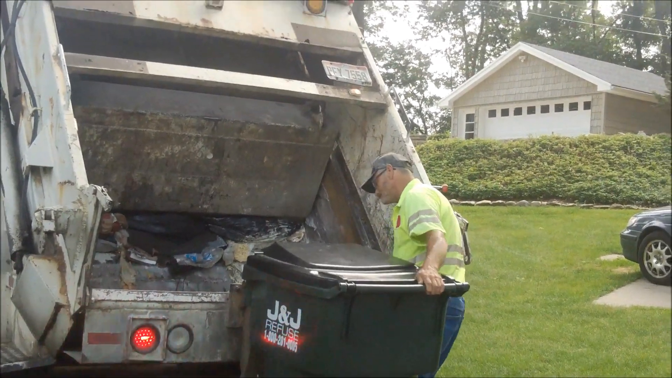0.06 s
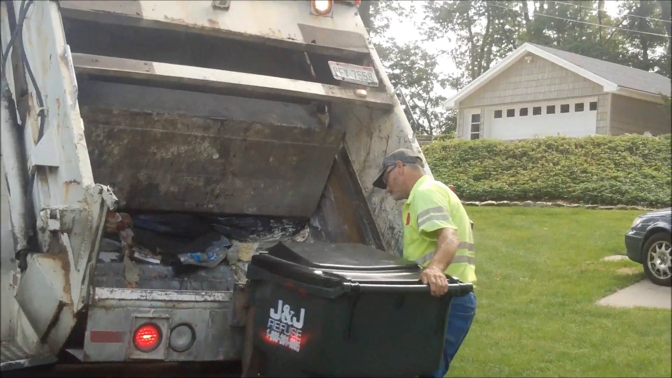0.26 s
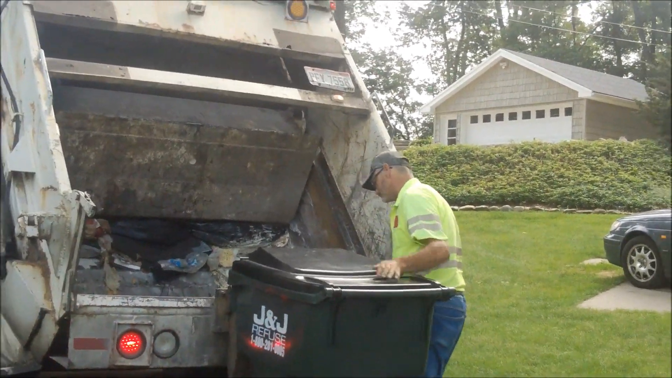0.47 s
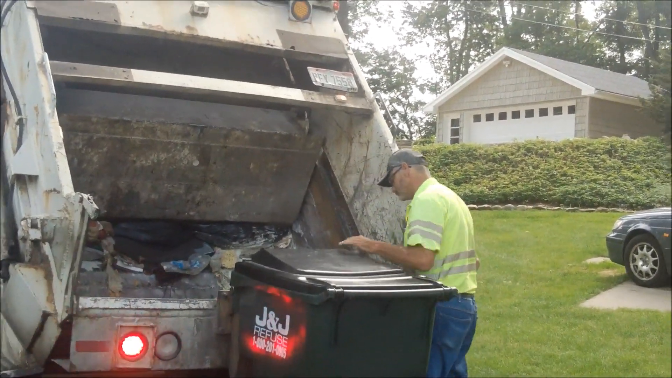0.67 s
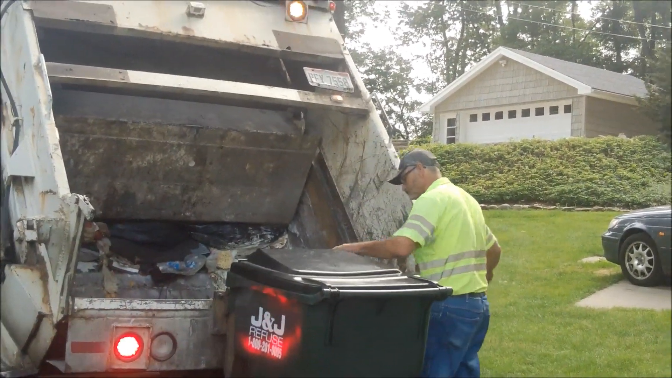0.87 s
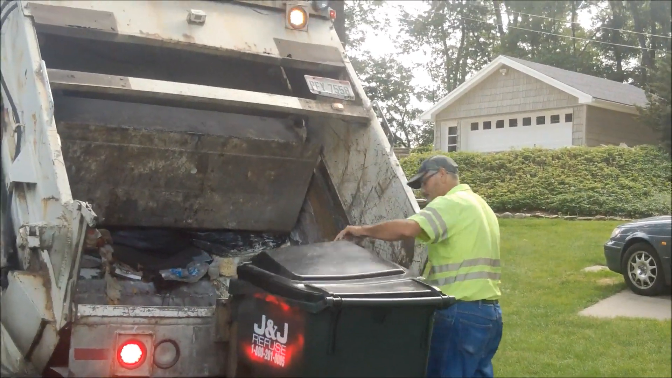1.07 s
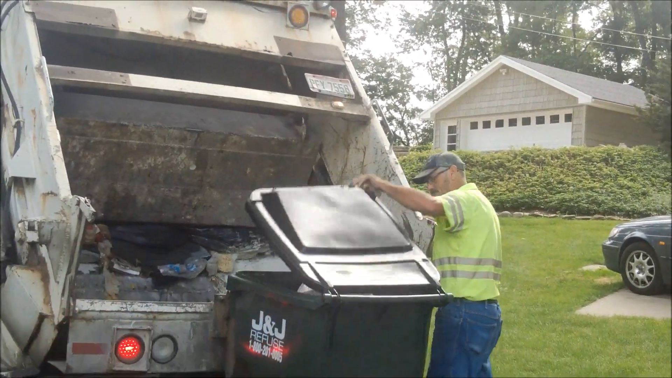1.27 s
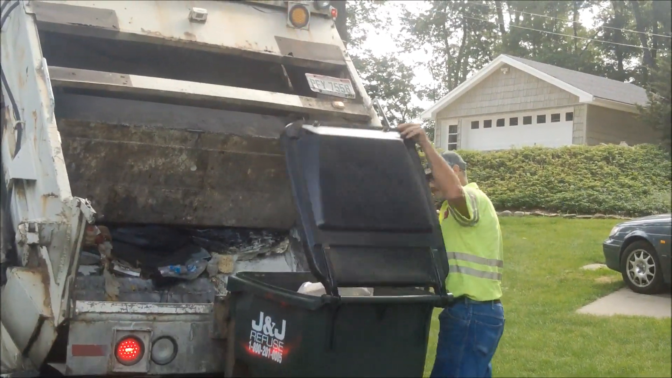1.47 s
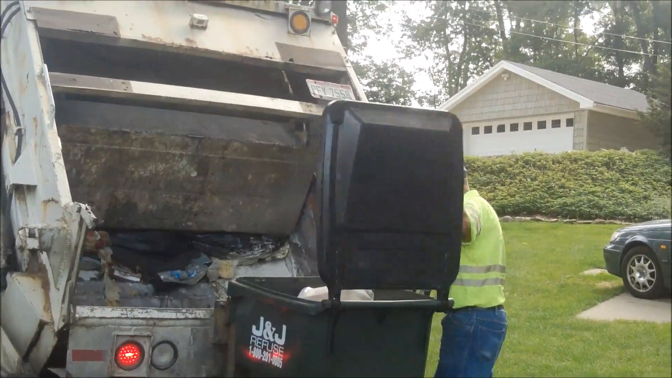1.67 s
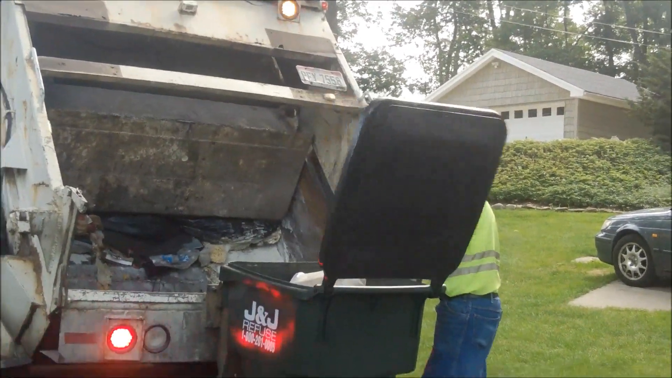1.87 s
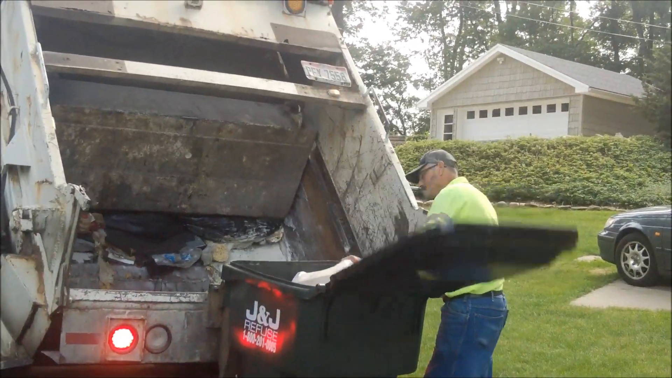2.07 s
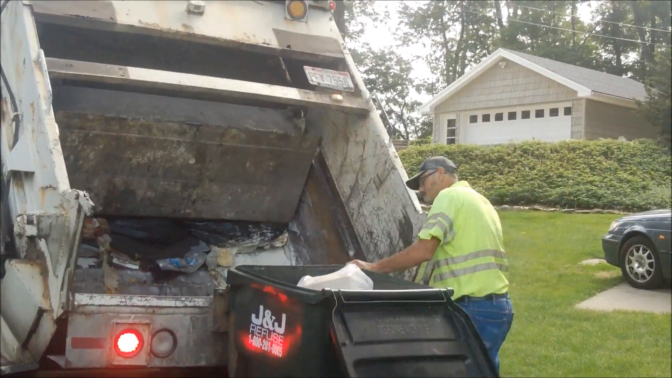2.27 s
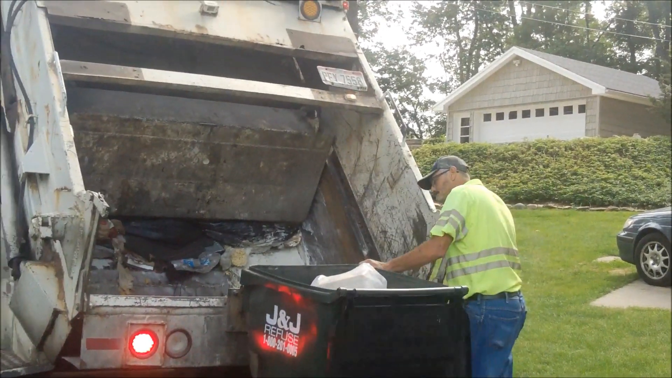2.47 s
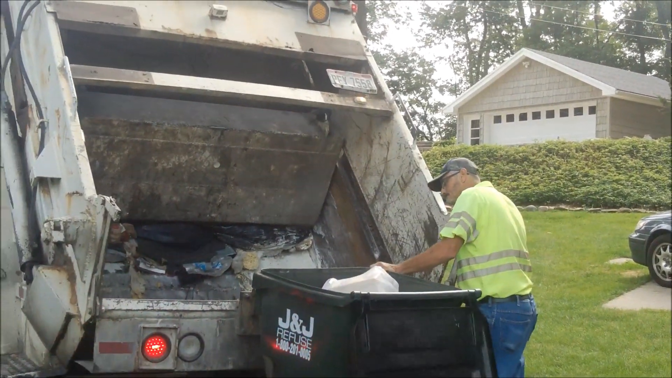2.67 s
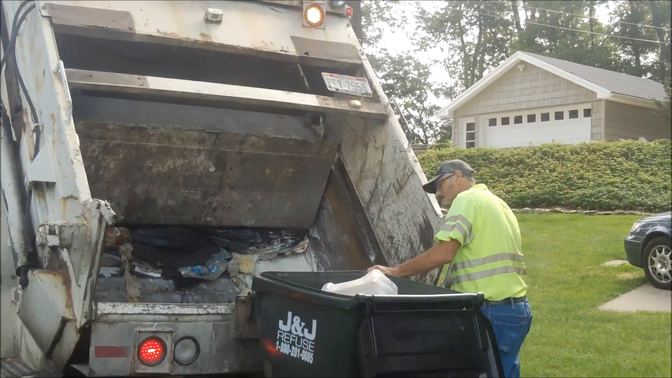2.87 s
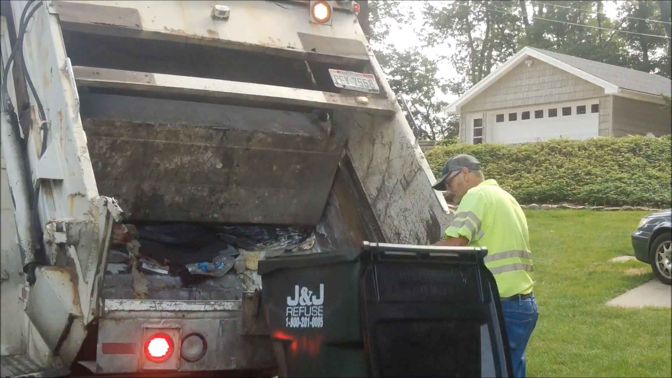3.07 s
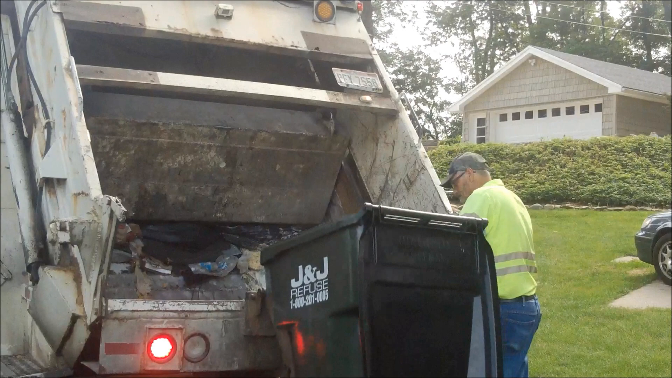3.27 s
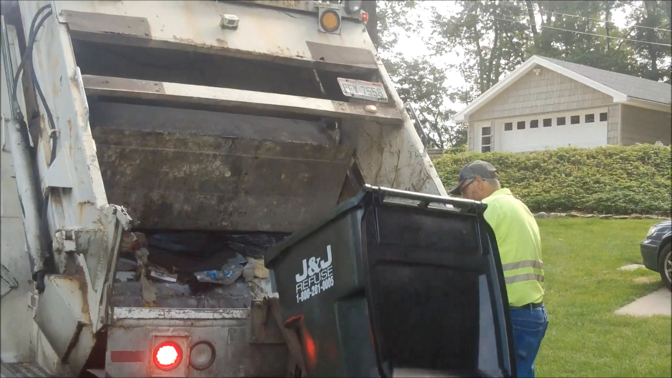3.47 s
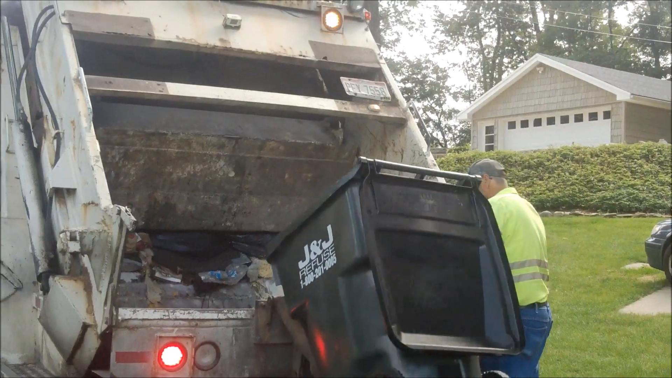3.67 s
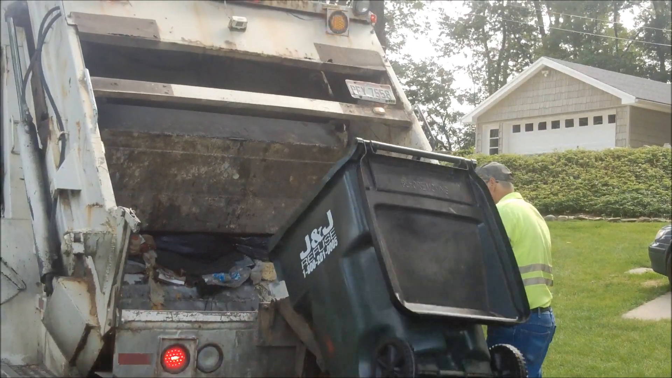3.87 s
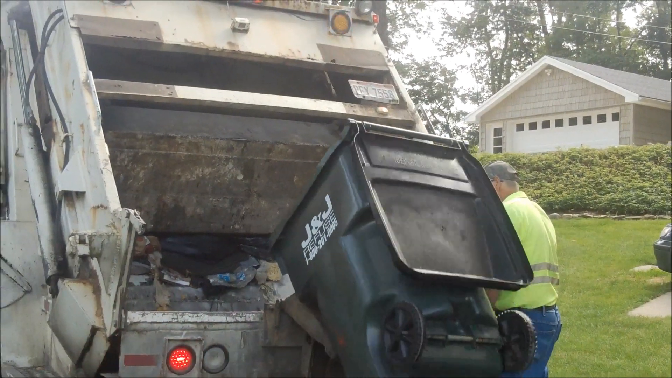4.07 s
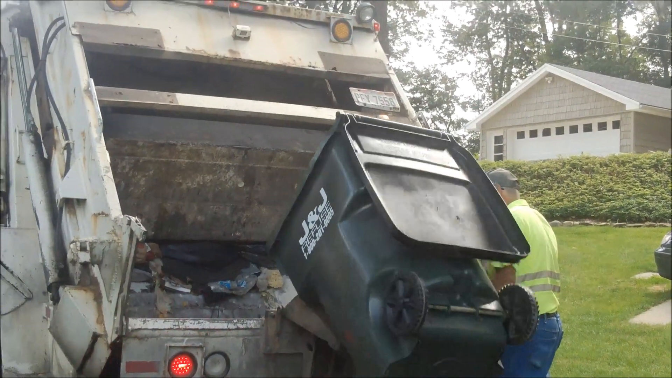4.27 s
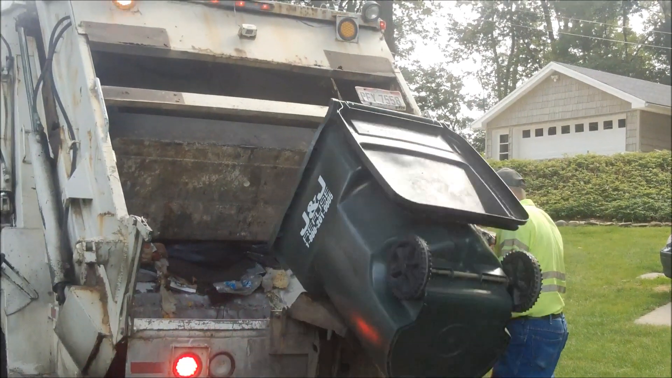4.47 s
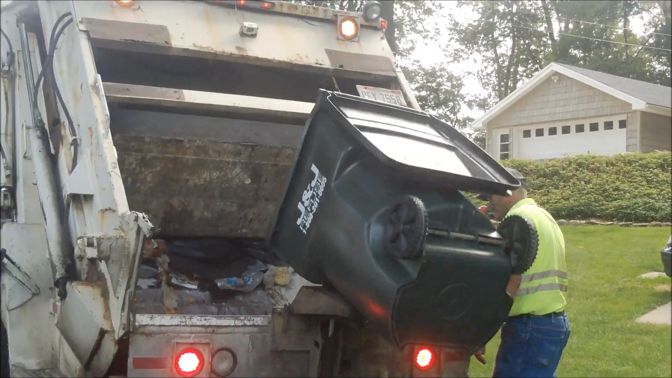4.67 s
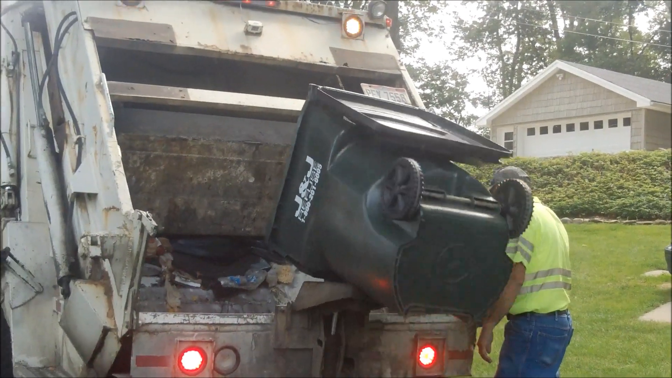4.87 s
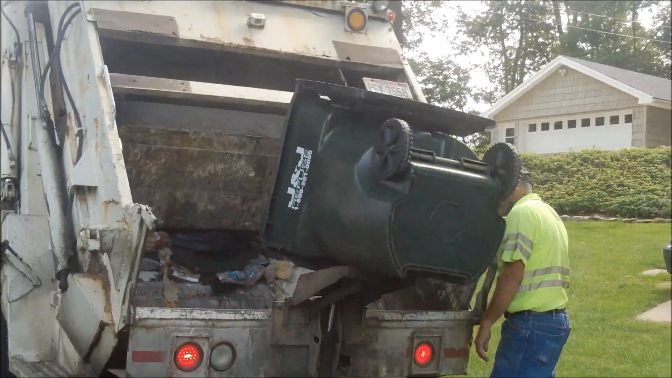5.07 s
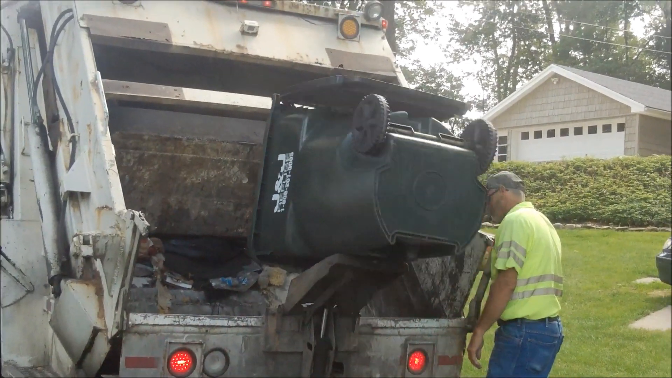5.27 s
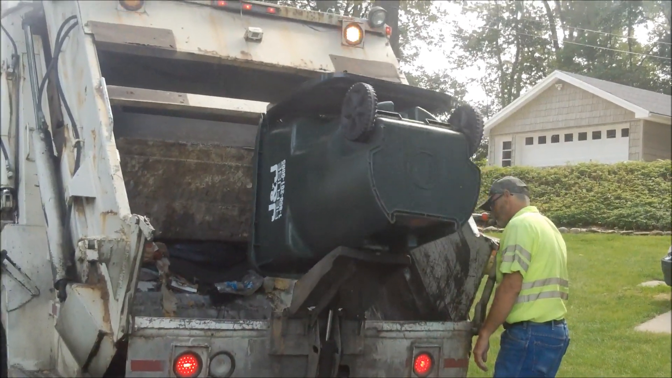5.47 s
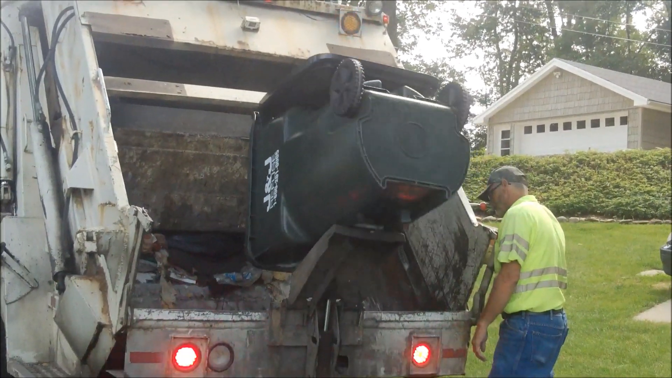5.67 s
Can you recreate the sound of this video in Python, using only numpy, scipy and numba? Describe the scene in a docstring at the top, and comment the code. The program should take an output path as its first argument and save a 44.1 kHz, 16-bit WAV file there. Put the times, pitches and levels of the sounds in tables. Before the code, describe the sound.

A close, almost mono outdoor capture of a refuse truck. From 0 to 2.1 s a six-cylinder diesel idles steadily: low humming pulses, mid-range mechanical clatter, bright valve ticking and deep rumble, with a thin hydraulic pump whine on top. At about 2.15 s a valve opens and oil hisses sharply through pipes; pump and engine slow under load. At 2.54 s the steel tipper slams onto the plastic bin, a clipped, harsh clang with a hollow thud, followed by rapid bouncing rattles until about 2.75 s and a diffuse metallic tail. Tiny squeaks chirp at 2.8 to 3 s. The pump strains most near 3.2 s, then recovers into a steady lift, its whine and hiss gently surging about every 0.4 s as the bin rocks. Faint dull knocks fall at 3.4 to 3.6 s. Near 5.25 to 5.5 s come light clinks, squeaks and a soft knock as the pump slows again.

```python
"""Refuse truck lifting a wheeled bin

A six-cylinder diesel idles with hum and clatter while a hydraulic pump whines: harmonics plus shaped noise.
A valve opens, oil hisses through resonant pipes, and the load drags the pump, and the engine with it, down.
The steel tipper slams onto the bin, rattles, and lifts it with dull knocks and squeaks: decaying modes,
noise bursts and pitch-rough tones. The nearly mono microphone clips at the slam."""
import sys
import numpy as np
from scipy import signal
from scipy.fft import rfft, irfft
from scipy.io import wavfile
from scipy.ndimage import uniform_filter1d, map_coordinates
from numba import njit

SR = 44100
rng = np.random.default_rng(int(sys.argv[2]) if len(sys.argv) > 2 else 0)


def to_wav(sig):
    """Store sig (one row per channel, or 1-D mono) as 16-bit WAV at the path in sys.argv[1].

    Samples outside -1..1 are clipped; the rate is SR.
    """
    pcm = np.clip(np.atleast_2d(sig), -1, 1) * 32767
    pcm = np.round(pcm).astype(np.int16)
    wavfile.write(sys.argv[1], SR, pcm.T)  # frames by channels


N = 252252
T = np.arange(N) / SR

# gear mesh rate with the pump straining, lifting and running free: mesh_hz
DUTY_HZ = [226, 244, 259]
# modes of the hollow bin: mode_hz, relative_db, t60_s
BIN_MODES = [(44.8, -2.5, 0.11), (88.3, -9, 0.4), (127.5, -3.5, 0.15), (195, -7, .16), (230, -5, 0.13),
             (339, -10.5, 0.11)]
# pump tooth rate as a multiple of the mesh rate; teeth passing per shaft turn
TEETH_PER_MESH, PUMP_TEETH = .8826, 10


def undb(db):
    """Logarithmic level: decibels to amplitude gain."""
    return 10 ** (np.asarray(db) / 20)


def level(x, db=0):
    """Mean power: scale a signal to an rms level in dB."""
    return x * undb(db) / np.sqrt(np.mean(x ** 2))


def curves(rows):
    """Linear interpolation: the columns of a table joined by straight lines in time."""
    s, *columns = np.transpose(rows)
    return [np.interp(T, s, c) for c in columns]


def noise():
    """White noise: equal mean power at every frequency."""
    return rng.standard_normal(N)


def colour(x, points):
    """Spectral shaping by (Hz, dB) points, falling 60 dB per octave beyond its ends; rms 1."""
    hz, db = np.transpose(points)
    bin_hz = np.arange(len(x) // 2 + 1) * SR / len(x)
    octave, known = np.log2(bin_hz + 1), np.log2(hz)
    beyond = np.abs(octave - np.clip(octave, known.min(), known.max()))
    gain = undb(np.interp(octave, known, db) - 60 * beyond)
    return level(irfft(rfft(x) * gain, len(x)))


def walk(rate):
    """Slow random fluctuation: levels held 1 / rate s, then smoothed twice; rms 1."""
    hold = int(SR / rate)
    steps = np.repeat(rng.standard_normal(N // hold + 1), hold)
    smooth = uniform_filter1d(uniform_filter1d(steps, hold), hold)
    return level(smooth[:N])


def turns(hz):
    """Phase as the integral of frequency: cycles completed at a changing rate."""
    return np.cumsum(hz) / SR


def fade(t, t60):
    """Exponential damping: amplitude falls 60 dB in t60 seconds."""
    return np.exp(-np.log(1000) * t / t60)


def swell(at, half):
    """Gaussian envelope: a bell falling to 1 / e at half seconds from its peak."""
    return np.exp(-((T - at) / half) ** 2)


def lag(x, seconds):
    """First-order inertia: follow a control with a time constant."""
    share = 1 / (seconds * SR)
    return signal.lfilter([share], [1, share - 1], x)


@njit
def resonate(x, hz, width):
    """Resonance with a moving centre: a state-variable band-pass."""
    y, band_state, low_state = np.empty(len(x)), 0., 0.
    for i in range(len(x)):
        g, damping = np.tan(np.pi * hz[i] / SR), width / hz[i]
        v = (band_state + g * (x[i] - low_state)) / (1 + g * (g + damping))
        band_state = 2 * v - band_state
        low_state = low_state + 2 * g * v
        y[i] = damping * v
    return y


def band(hz, width):
    """Forced resonance: noise exciting one mode of a given bandwidth in Hz."""
    return resonate(noise(), np.full(N, float(hz)), float(width))


def bands(modes):
    """Modal superposition: noise exciting (Hz, width Hz, dB) resonances; rms 1."""
    return level(sum(level(band(hz, width), db) for hz, width, db in modes))


def ring(x, t60, wet_db):
    """Diffuse structural ringing: convolution with exponentially decaying noise, added to the input."""
    t = T[:SR]
    tail = rng.standard_normal(len(t)) * fade(t, t60)
    return x + undb(wet_db) * signal.fftconvolve(x, tail / np.linalg.norm(tail))[:N]


def clatter(firings, order=6):
    """Periodic impact noise: parts knock in one pattern on every round of the six cylinders."""
    pattern = rng.standard_normal(SR // 10)
    position = firings / order % 1 * len(pattern)
    return level(map_coordinates(pattern, [position], order=3, mode="grid-wrap"))


def diesel(load, drag_hz):
    """Harmonic exhaust pulsation that sags and swells under drag, over engine-cycle clatter and rumble."""
    # exhaust harmonics: multiple of the firing rate, relative_db
    exhaust = [(.5, -15), (1, 3), (2, -1.5), (3, -22)]
    # noise spectrum of the engine block: frequency_hz, relative_density_db
    block_spectrum = [(150, -7), (210, -8), (260, -15.5), (330, -9.5), (430, -13), (480, -17), (630, -20.5),
                      (740, -5), (830, -11.5), (910, -3), (990, -7.5), (1100, 1), (1250, -4.5), (1370, -7),
                      (1600, -11.5), (1900, -16.5), (2200, -19)]
    # noise spectrum of the valve gear: frequency_hz, relative_density_db
    valve_spectrum = [(1800, -21), (2100, -11.5), (2450, -5.5), (2900, -2.5), (3300, -2), (4100, -0.5),
                      (4750, 0.5), (5400, -5), (6200, -4.5), (6700, -0.5), (7400, -7.5), (8200, -22),
                      (9300, -18.5), (10000, -24.5), (11000, -24), (15800, -31.5)]
    # spectrum of the low rumble: frequency_hz, relative_density_db
    rumble_spectrum = [(4.7, -46), (8.0, 4), (65, 5), (139, -7), (157, -5.5), (177, -13.5), (200, -19),
                       (260, -40), (440, -120)]
    idle_hz, sag_hz_per_mesh_hz, engine_lag_s = 64.05, .086, .25  # idle as firing rate
    hum_base_db, hum_db_per_sag_hz = -27, 0.97

    sag_hz = sag_hz_per_mesh_hz * lag(drag_hz, engine_lag_s)
    firing_hz = idle_hz - sag_hz
    hum_db = hum_base_db + hum_db_per_sag_hz * sag_hz
    firings = turns(firing_hz * (1 + 0.00299 * walk(12)))
    hum = 0
    for multiple, db in exhaust:
        # the higher pressure waves leave the pipe slightly late
        phase = 2 * np.pi * multiple * firings - 0.56 * (multiple - 1)
        hum = hum + undb(db + hum_db + 0.44 * walk(18)) * np.cos(phase)

    beat = np.cos(2 * np.pi * firings)
    knocking = (clatter(firings) + 0.64 * noise()) * (1 + 0.039 * beat)
    block = colour(knocking, block_spectrum) * undb(-36.5 + 0.51 * load)
    ticking = (noise() + 0.43 * clatter(firings)) * (1 + 0.031 * beat) * undb(0.51 * walk(15))
    valves = undb(-28.5) * colour(ring(ticking, t60=0.12, wet_db=-7.5), valve_spectrum)
    rumble = undb(-38.5 + 0.98 * load) * colour(noise(), rumble_spectrum)
    return hum + block + valves + rumble


def pump(mesh_hz, shaft, load):
    """Gear-mesh and tooth harmonics, lifted by a housing resonance and modulated once a shaft turn."""
    # gear whine: multiple of the mesh rate, then straining_db, lifting_db, free_db before modulation
    gear_whine = [(5, -43, -41.5, -44), (6, -50, -50, -48), (9, -62, -57, -52), (10, -62, -48, -55),
                  (11, -64, -53, -56), (12, -62, -39, -49)]
    # pump ripple: multiple of the tooth rate, then straining_db, lifting_db, free_db before modulation
    pump_whine = [(1, -39, -46, -49), (2, -44.5, -51, -54), (3, -62, -60, -49), (4, -54, -53, -55)]
    # pump housing resonance: centre_hz, half_width_hz, boost_db
    housing = (1438, 16, 10)

    out, mesh = 0, turns(mesh_hz)
    wobble = 0.0049 * load * np.sin(2 * np.pi * shaft) + 0.0049 * walk(25)  # cycles
    throb_db = .3 * load * np.cos(2 * np.pi * shaft)
    centre_hz, half_width_hz, boost_db = housing
    for ratio, tones in ((1, gear_whine), (TEETH_PER_MESH, pump_whine)):
        for multiple, *duty_db in tones:
            tone_hz = multiple * ratio * mesh_hz
            housing_db = boost_db / (1 + ((tone_hz - centre_hz) / half_width_hz) ** 2)
            db = np.interp(mesh_hz, DUTY_HZ, duty_db) + housing_db
            db = db + multiple * throb_db + 1.2 * walk(12)
            phase = 2 * np.pi * multiple * (ratio * mesh + wobble)
            out = out + undb(db) * np.sqrt(2) * np.sin(phase)
    return out


def rocking():
    """Damped oscillation: the lifted bin swings on the tipper; positive when it bears down."""
    lift_off_s, period_s, t60_s = 3.2, .41, 4.25
    t = np.maximum(T - lift_off_s, 0)
    return -np.sin(2 * np.pi * t / period_s) * fade(t, t60_s)


def oil(shaft, strain):
    """Turbulent flow noise: pressure drives a valve jet, ringing pipes, fine spray and a droning frame."""
    # noise spectrum of oil in the pipes: frequency_hz, relative_density_db
    pipe_spectrum = [(2200, -38), (3200, -21), (5000, -15), (5700, -9), (5950, -10), (6150, -3),
                     (6500, -3.5), (6900, 1), (7650, -.5), (7950, -9.5), (9000, -20), (12000, -41)]
    # noise spectrum of the fine spray: frequency_hz, relative_density_db
    spray_spectrum = [(7800, -7), (8300, -13), (9300, 1), (10100, -8), (11400, -4.5), (12300, -9),
                      (13500, -11.5), (15000, -10), (15800, -11)]
    # sharp pipe resonances: mode_hz, relative_db
    pipe_modes = [(6142, -44), (6234, -43), (6298, -44), (6546, -45), (6928, -42), (7542, -45)]
    # truck frame shaken by the oil flow: mode_hz, width_hz, relative_db
    frame_modes = [(192, 44, -2), (405, 23, -16.5), (764, 26, -15), (902, 12.5, 3.5), (1064, 300, -3),
                   (1390, 140, -4.5)]
    # brief surges and checks of the flow: centre_s, half_length_s, pipe_change_db, jet_change_db
    surges = [(2.398, 0.13, 3.5, -8), (2.768, 0.024, 3, 7), (2.95, 0.12, 1.5, 2.5), (3.09, 0.048, 4, 2),
              (4.677, 0.041, 1, 1.5), (5.447, 0.027, .5, 5), (5.491, 0.013, -14, -7), (5.6, 0.02, -4, 2)]
    valve_opens_s, valve_rise_s = 2.154, 0.032  # rise as a time constant; it stays open
    # base levels in the steady lift, and their rise at full strain
    hiss_base_db, hiss_strain_db = -24, 4.5
    jet_base_db, jet_strain_db, jet_base_hz, jet_strain_hz = -35, 5.5, 4180, 696
    spray_base_db, spray_follows = -30, 0.8  # share of the pipe hiss's swing in dB

    # pressure acts 0.057 s before the pump slows
    pressure = np.interp(T + 0.057, T, strain)
    rock_db = 5.5 * rocking()
    pipe_surge_db = sum(db * swell(s, half) for s, half, db, _ in surges)
    jet_surge_db = sum(db * swell(s, half) for s, half, _, db in surges)
    swing_db = hiss_strain_db * pressure + rock_db + pipe_surge_db
    jet_db = jet_base_db + jet_strain_db * pressure + rock_db + jet_surge_db
    hiss_gain = undb(hiss_base_db + swing_db)
    throb = np.cos(2 * np.pi * shaft)

    singing = undb(-8) * bands([(hz, 25, db) for hz, db in pipe_modes])  # modes 25 Hz wide
    rushing = colour(ring(noise(), t60=0.047, wet_db=-1), pipe_spectrum)
    pipes = hiss_gain * level(rushing + singing)
    spray_db = spray_base_db + spray_follows * swing_db
    spray = colour(ring(noise(), t60=0.068, wet_db=-7), spray_spectrum) * undb(spray_db)
    jet_hz = (jet_base_hz + jet_strain_hz * pressure) * (1 + 0.081 * walk(30))
    jet_noise = resonate(resonate(noise(), jet_hz, 2500.0), jet_hz, 2500.0)
    jet = level(jet_noise) * undb(jet_db + throb)
    flutter_db = 1.4 * throb + .5 * walk(45)
    frame = hiss_gain * undb(-18.0) * bands(frame_modes)
    opened = 1 - np.exp(-np.maximum(T - valve_opens_s, 0) / valve_rise_s)
    return ((pipes + spray + jet) * undb(flutter_db) + frame) * opened


def squeaks():
    """Stick-slip friction: pivots squeak under the weight, as short tones of randomly rough pitch."""
    # squeaks: centre_s, half_length_s, pitch_hz, relative_db
    squeak_events = [(2.778, 0.011, 3900, -32), (2.925, 0.018, 4380, -34), (2.976, 0.0099, 3930, -28),
                     (5.263, 0.0071, 4240, -28), (5.41, 0.012, 6100, -30), (5.456, .016, 4340, -29)]
    out = 0
    for s, half, hz, db in squeak_events:
        cycles = turns(hz * (1 + .04 * walk(500)))
        out = out + level(np.sin(2 * np.pi * cycles), db + 4.5) * swell(s, half)
    return out


def struck(modes, t):
    """Modal impact response: damped sines, whose shares and pitches vary with the contact point."""
    chance = rng.standard_normal((len(modes), 2))
    out = 0
    for (hz, db, t60), (share, detune) in zip(modes, chance):
        tone = np.sin(2 * np.pi * hz * (1 + 0.0069 * detune) * t)
        out = out + undb(db + 1.0 * share) * tone * fade(t, t60)
    return out / np.linalg.norm(undb([db for _, db, _ in modes]))


def body(t):
    """Modal density: distinct steel modes ring over crowded, quickly damped panel modes heard as noise."""
    # tipper and hopper steel: mode_hz, relative_db, t60_s
    steel_modes = [(395, -15, 0.3), (417, -18, 0.27), (694, -27, 0.088), (742, 7.5, 0.1), (767, 6.5, 0.14),
                   (860, -2, 0.074), (907, 5, 0.13), (1025, -5, 0.099), (1054, -11, 0.14), (1148, -5, 0.16),
                   (1215, -11, 0.41), (1630, -2, .15), (1985, -7, 0.26), (2430, -3, 0.24)]
    # crowded panel modes of bin and hopper: frequency_hz, relative_density_db
    panel_spectrum = [(100, 5), (240, -2), (300, -10), (400, -5.5), (560, -20), (660, -16), (750, 3),
                      (820, -12), (910, 3.5), (1120, -4.5), (1350, -11.5), (2400, -16)]
    steel = struck(steel_modes, t)
    panels = colour(rng.standard_normal(len(t)), panel_spectrum) * fade(t, 0.14)
    return undb(-1.5) * steel + undb(-5.0) * panels


def clash(t):
    """Hard contact excites a wide band: a bright burst of varying colour that also shakes panels and bin."""
    # steel on steel: frequency_hz, relative_density_db
    clash_spectrum = [(550, -38), (1000, 0), (1900, -11.5), (3400, 0.5), (5200, -4.5), (7100, 4.5),
                      (8400, -6), (12000, -14), (16000, -21)]
    chances = rng.standard_normal(len(clash_spectrum))
    contact_colour = [(hz, db + 2 * chance) for (hz, db), chance in zip(clash_spectrum, chances)]
    envelope = fade(t, 0.028) + undb(-25.5) * fade(t, 0.21)
    steel = colour(rng.standard_normal(len(t)), contact_colour) * envelope
    return undb(4.5) * steel + undb(-15) * body(t) + undb(-18) * struck(BIN_MODES, t)


def knock(t):
    """Soft contact excites few high modes: low-passed panels and a thud of the hollow plastic bin."""
    soft_hz = 1300  # little rings above this
    muffled = signal.sosfilt(signal.butter(2, soft_hz, fs=SR, output="sos"), body(t))
    return muffled + undb(-16) * struck(BIN_MODES, t)


def tipper():
    """Impact sequence: clashes and knocks excite their modes, and the hopper echoes them diffusely."""
    # steel strikes steel as the tipper slams home, bounces and later shifts: start_s, relative_db
    clashes = [(2.5396, 2.5), (2.55, -5), (2.5651, 0), (2.586, -6), (2.595, -6), (2.6122, -3.5),
               (2.656, -3), (2.6815, -14), (2.7033, -5), (2.7274, -13), (2.7357, -17), (5.256, -21),
               (5.321, -23)]
    # dull knocks of the bin against the tipper: start_s, relative_db
    knocks = [(2.5402, 4.5), (3.398, -19), (3.426, -22), (3.475, -24), (3.632, -26.5), (5.488, -17)]
    out, t = np.zeros(N + SR), T[:SR]
    contact = 1 - fade(t, 0.0057)  # softened onset
    for blow, events in ((clash, clashes), (knock, knocks)):
        for s, db in events:
            start = int(s * SR)
            out[start:start + SR] += undb(db) * contact * blow(t)
    return ring(out[:N], t60=1.0, wet_db=-8.5)


def scene():
    """Common control and superposition: pump speed tells its load; sources sum ahead, with faint side hiss."""
    # pump speed before the bin's rocking: time_s, mesh_hz
    drive = [(2.15, 259.2), (2.3, 251), (2.45, 237), (2.88, 234.5), (3.2, 222), (3.32, 238), (3.42, 243),
             (3.9, 244.5), (5.46, 244), (5.6, 219), (5.72, 212)]
    mesh_hz = curves(drive)[0] - 4.53 * rocking()
    straining_hz, lifting_hz, free_hz = DUTY_HZ
    load = np.interp(mesh_hz, DUTY_HZ, [1, 1, 0])
    strain = (lifting_hz - mesh_hz) / (lifting_hz - straining_hz)
    shaft = turns(mesh_hz) * TEETH_PER_MESH / PUMP_TEETH
    machinery = diesel(load, free_hz - mesh_hz) + pump(mesh_hz, shaft, load) + oil(shaft, strain)
    mid = machinery + squeaks() + tipper()
    # opposite in sign left and right
    side = undb(-55) * colour(noise(), [(200, 8), (2000, -13), (7000, -16.5), (15000, 14)])
    return np.array([mid + side, mid - side])


def record(dry):
    """Overload and band limiting: the microphone clips peaks, then a steep low-pass cuts the top."""
    top_hz = 15750
    clipped = np.clip(dry, -.93, .93)
    return signal.sosfilt(signal.ellip(12, .2, 80, top_hz, fs=SR, output="sos"), clipped)


dry = scene()
out = record(dry)
to_wav(out)
```